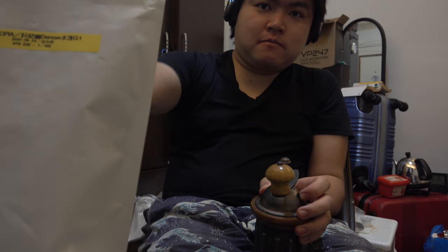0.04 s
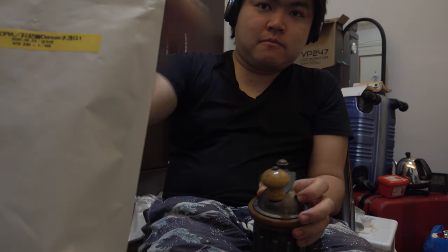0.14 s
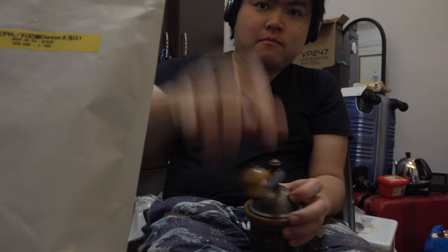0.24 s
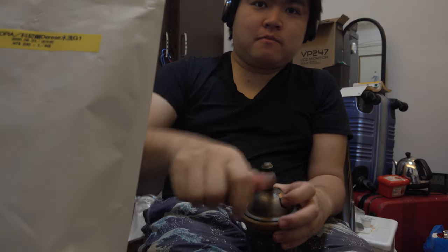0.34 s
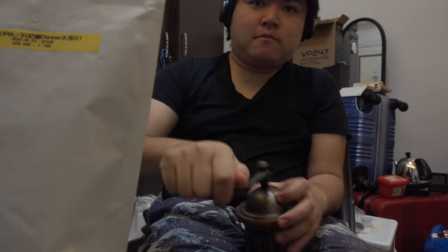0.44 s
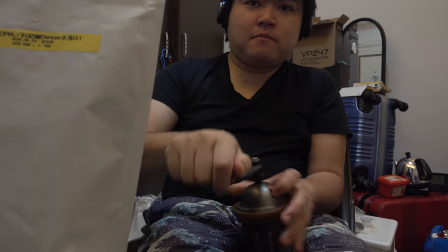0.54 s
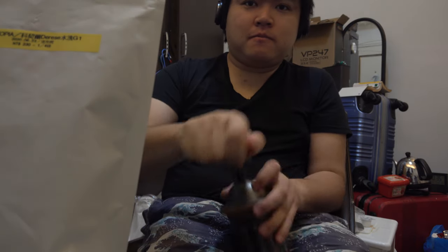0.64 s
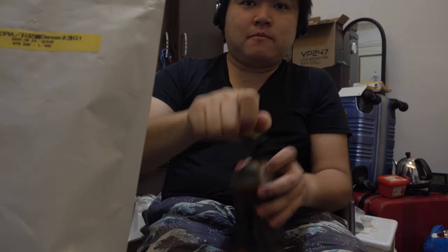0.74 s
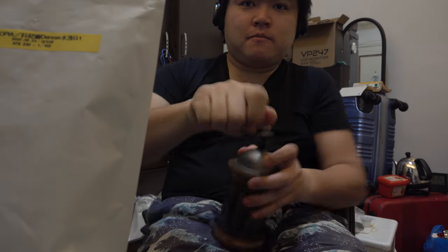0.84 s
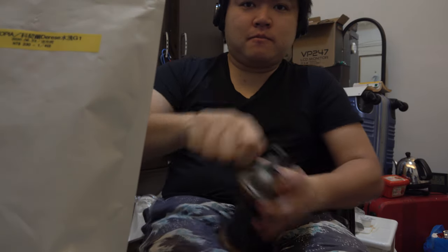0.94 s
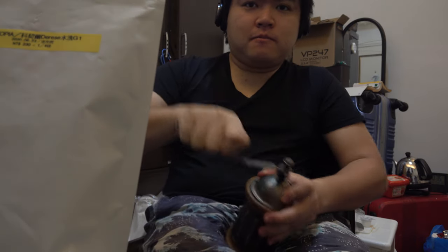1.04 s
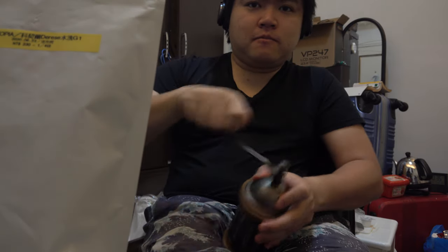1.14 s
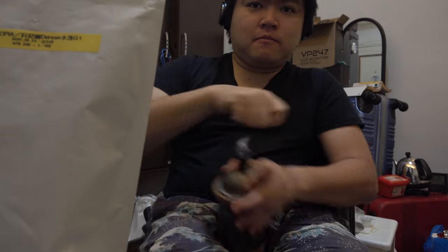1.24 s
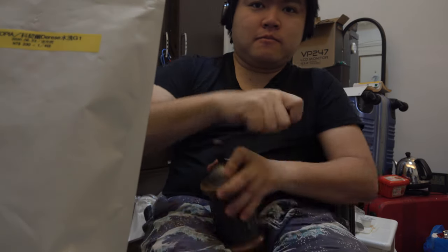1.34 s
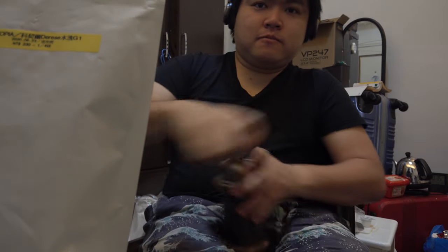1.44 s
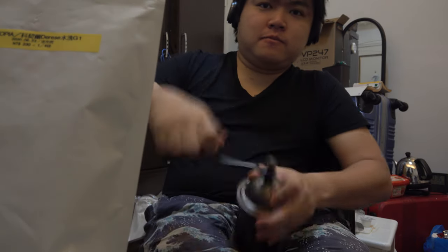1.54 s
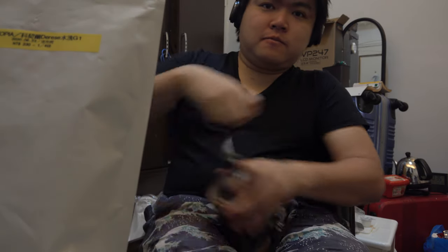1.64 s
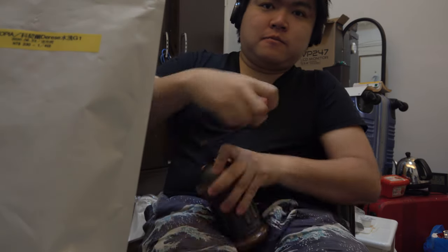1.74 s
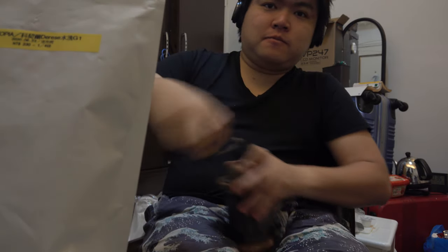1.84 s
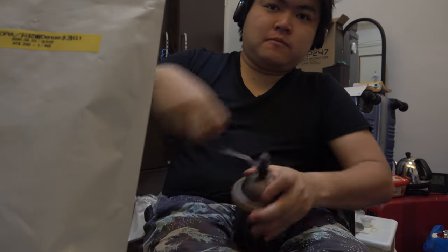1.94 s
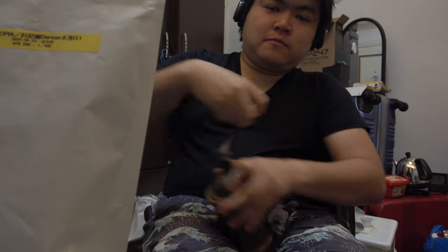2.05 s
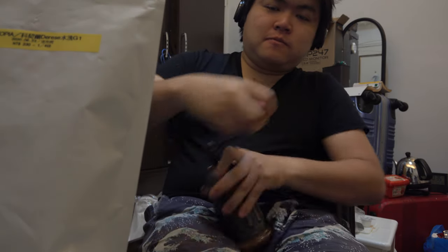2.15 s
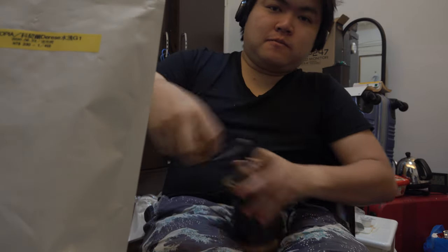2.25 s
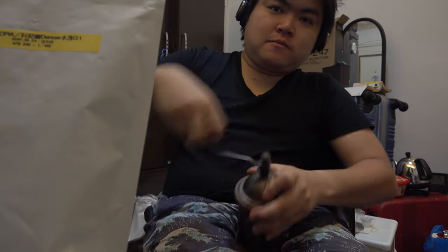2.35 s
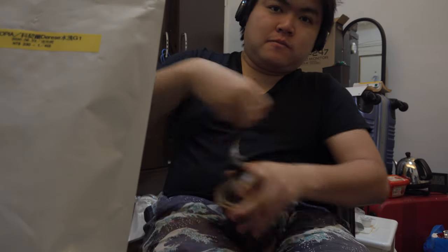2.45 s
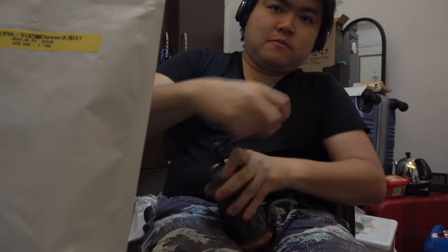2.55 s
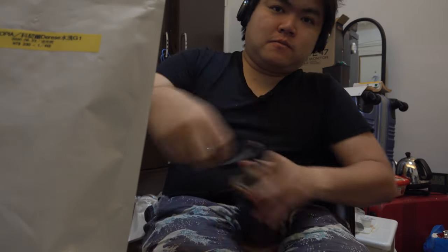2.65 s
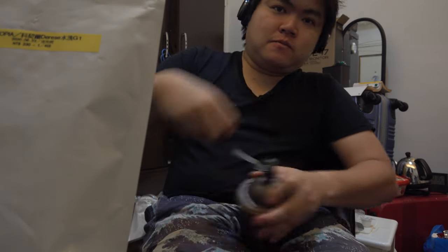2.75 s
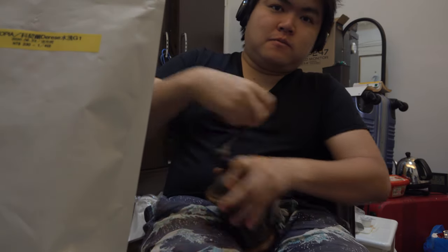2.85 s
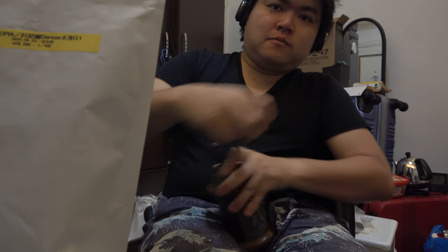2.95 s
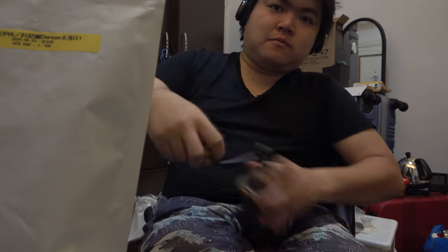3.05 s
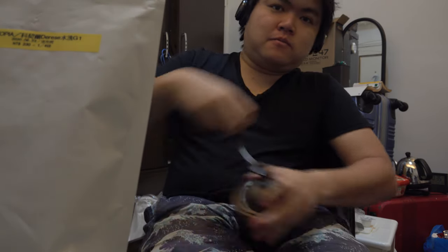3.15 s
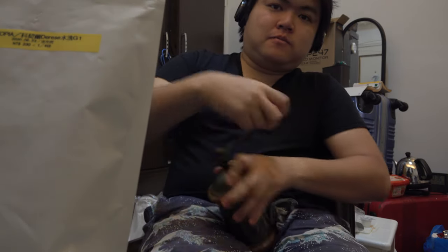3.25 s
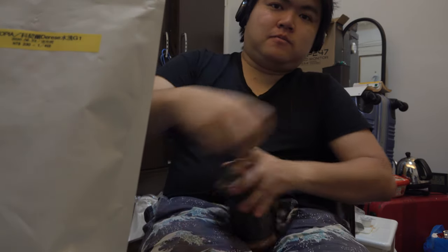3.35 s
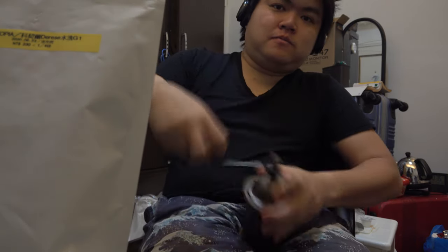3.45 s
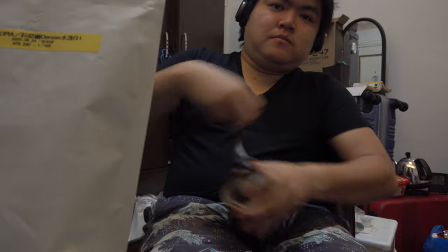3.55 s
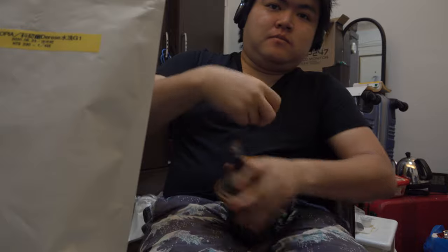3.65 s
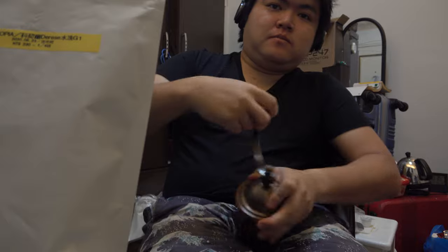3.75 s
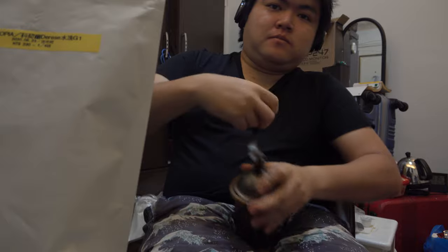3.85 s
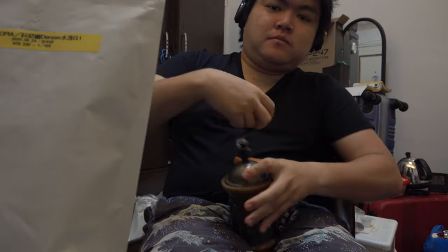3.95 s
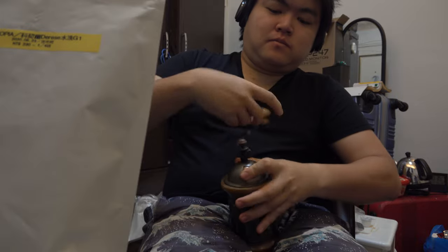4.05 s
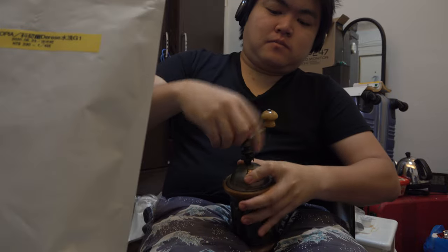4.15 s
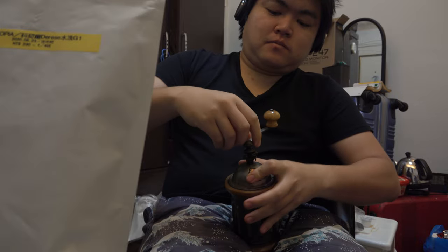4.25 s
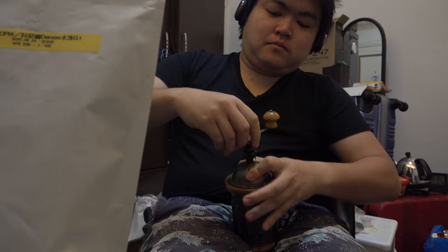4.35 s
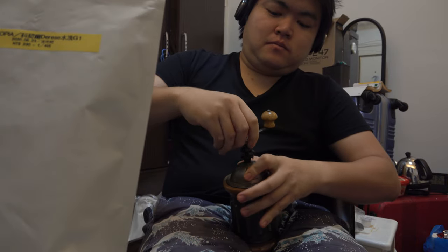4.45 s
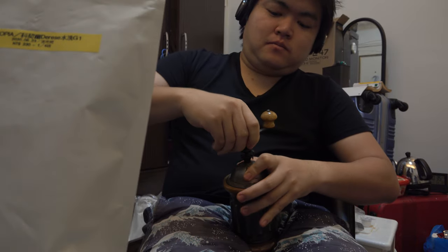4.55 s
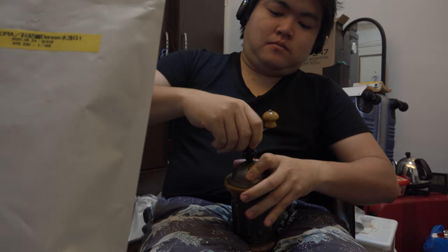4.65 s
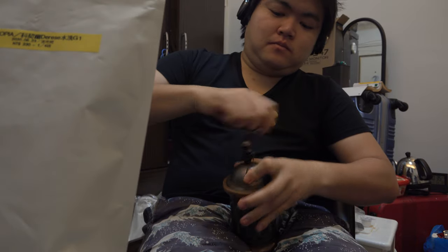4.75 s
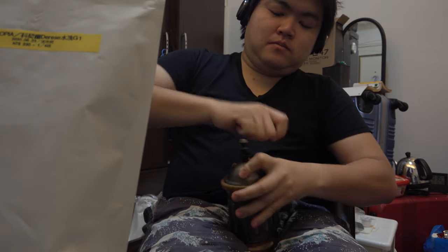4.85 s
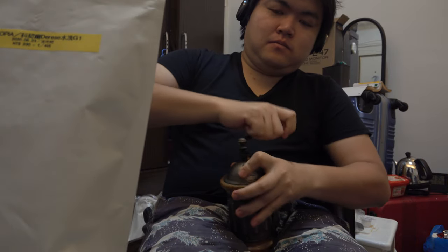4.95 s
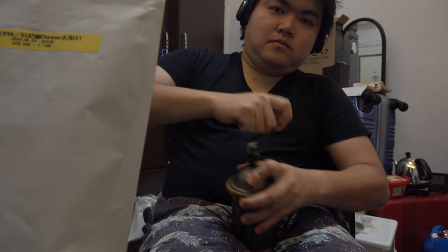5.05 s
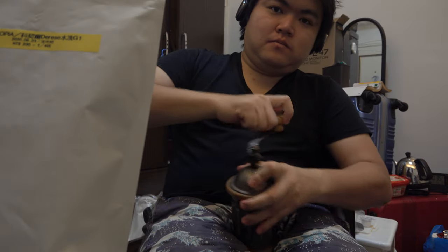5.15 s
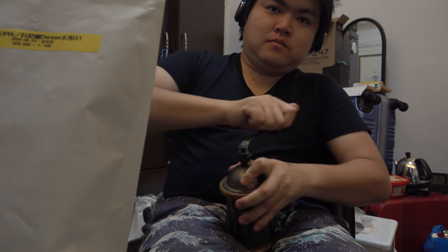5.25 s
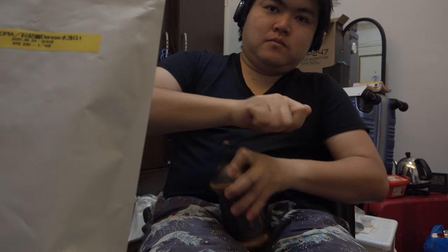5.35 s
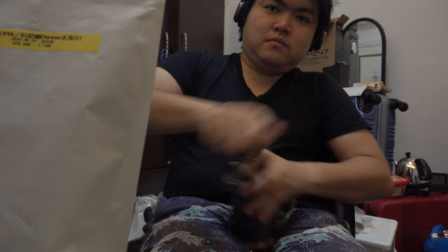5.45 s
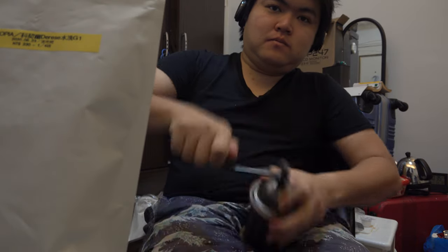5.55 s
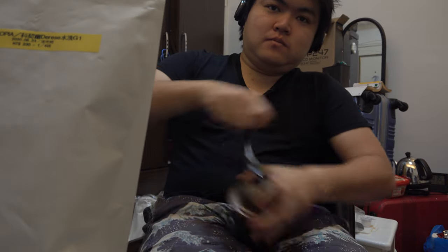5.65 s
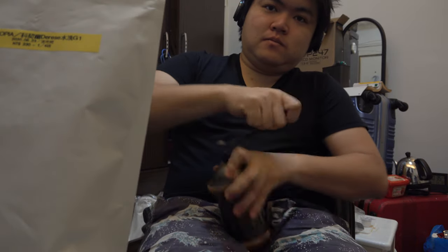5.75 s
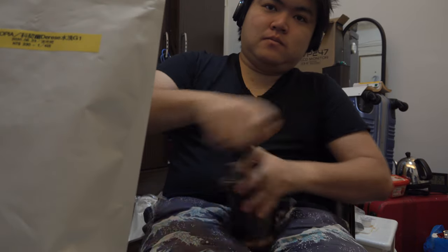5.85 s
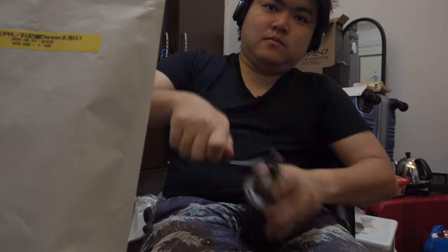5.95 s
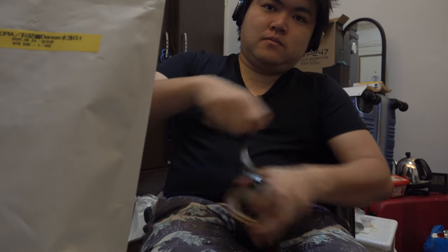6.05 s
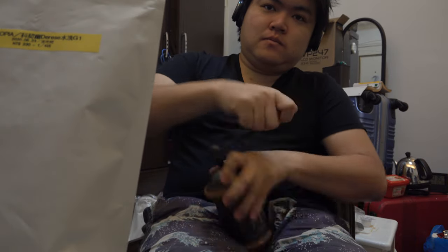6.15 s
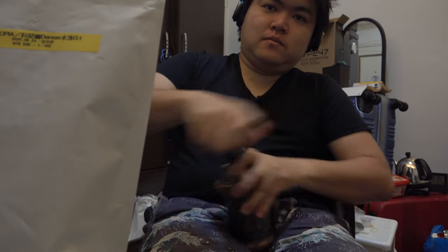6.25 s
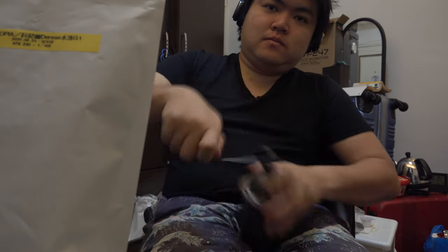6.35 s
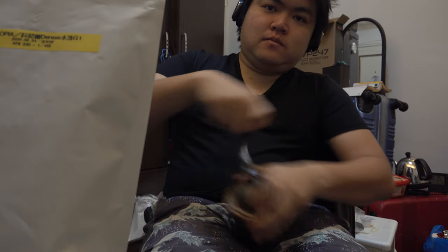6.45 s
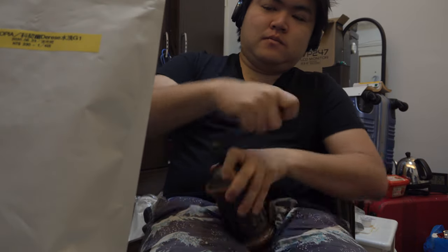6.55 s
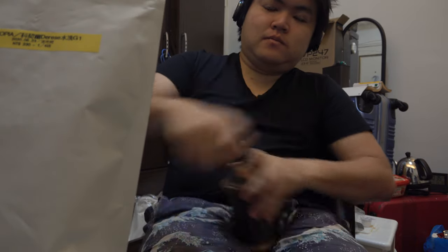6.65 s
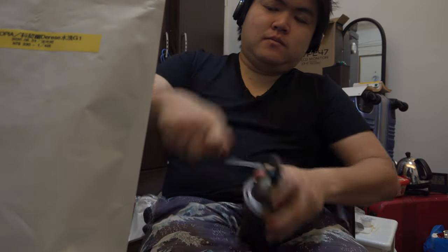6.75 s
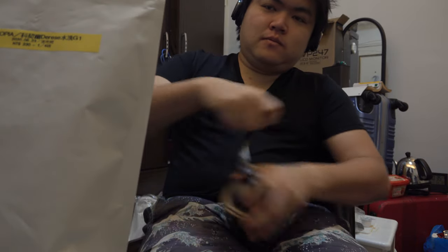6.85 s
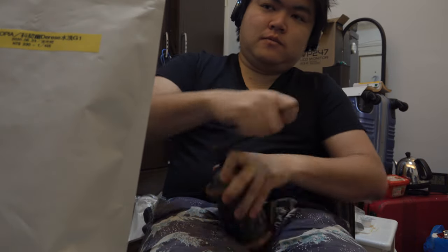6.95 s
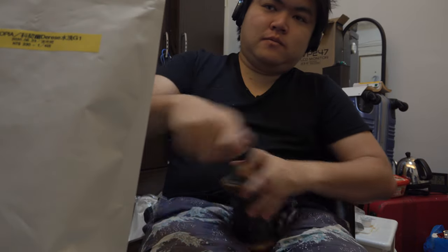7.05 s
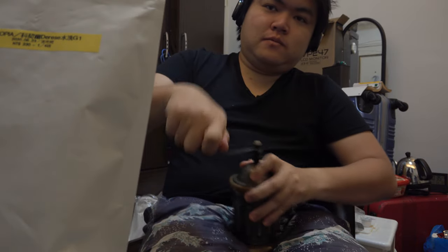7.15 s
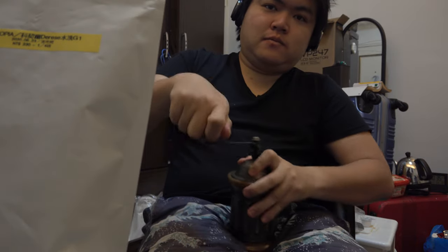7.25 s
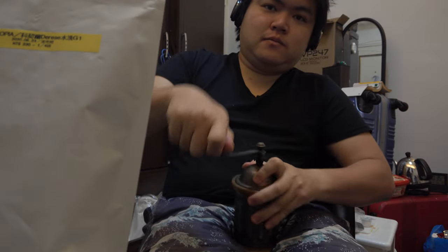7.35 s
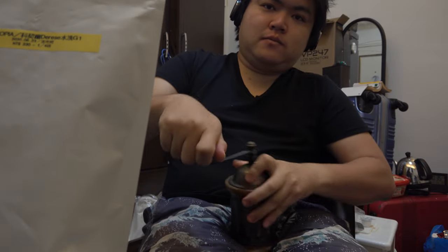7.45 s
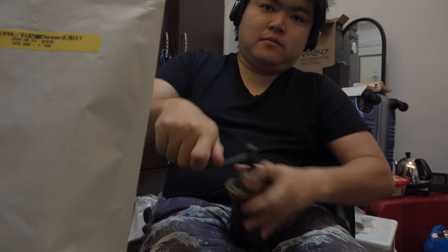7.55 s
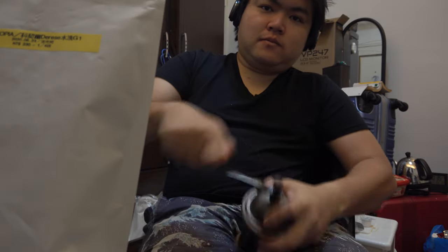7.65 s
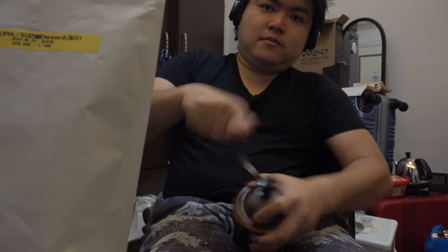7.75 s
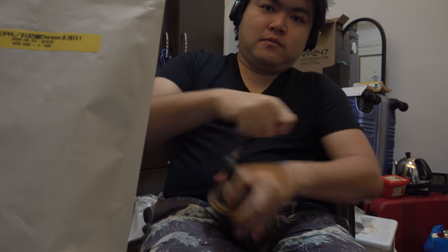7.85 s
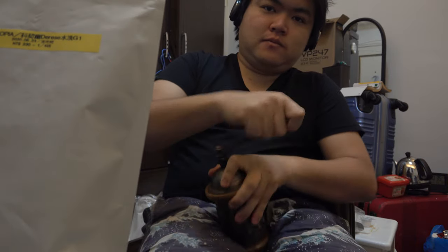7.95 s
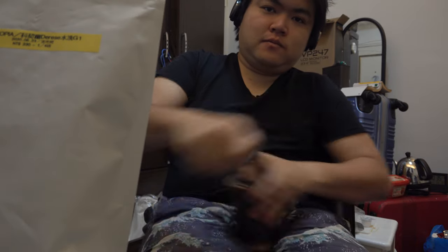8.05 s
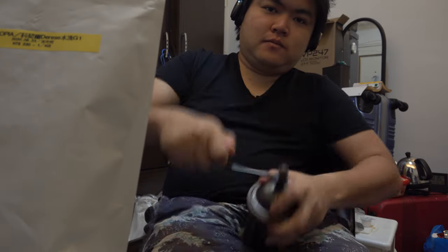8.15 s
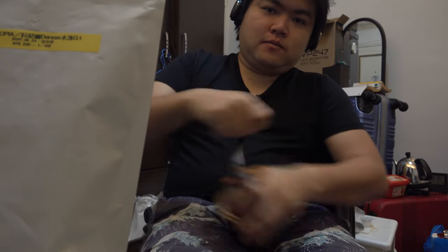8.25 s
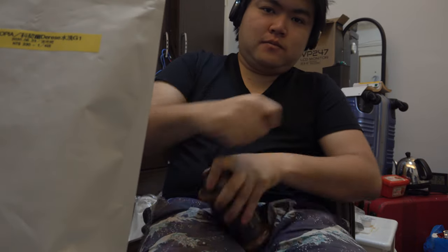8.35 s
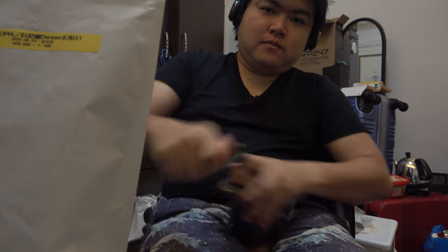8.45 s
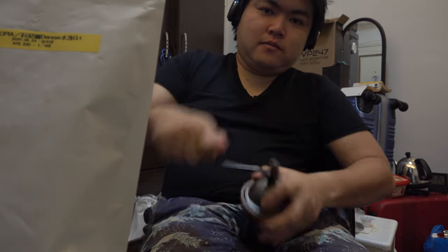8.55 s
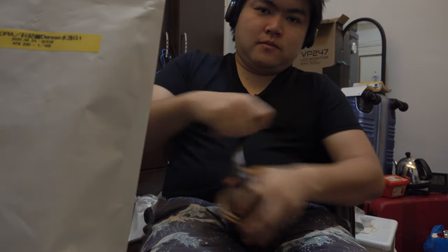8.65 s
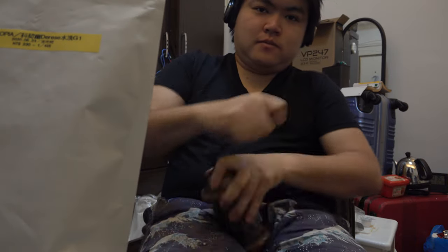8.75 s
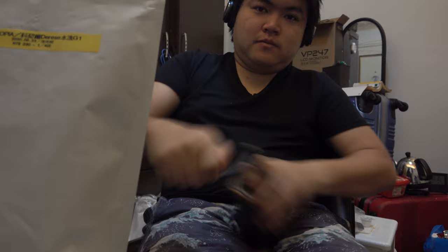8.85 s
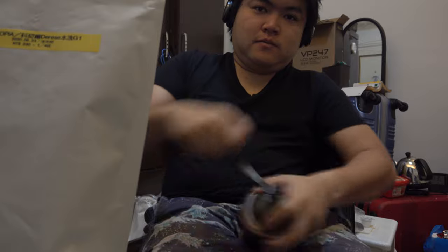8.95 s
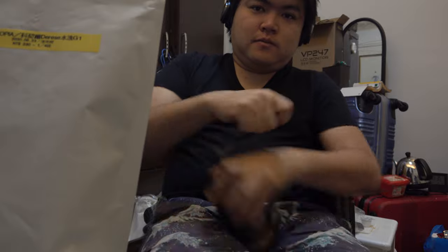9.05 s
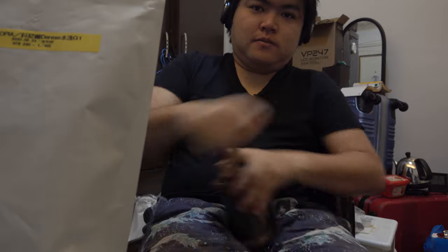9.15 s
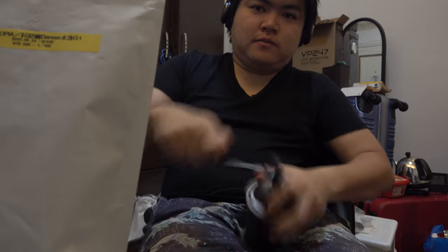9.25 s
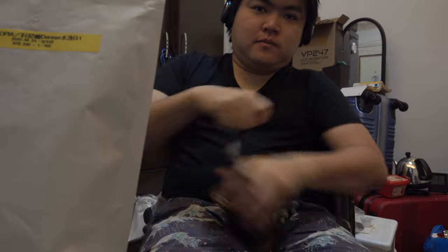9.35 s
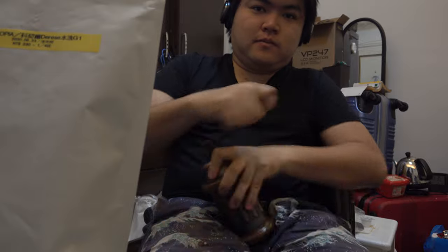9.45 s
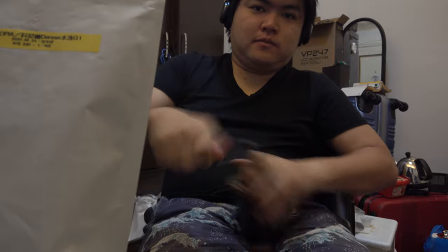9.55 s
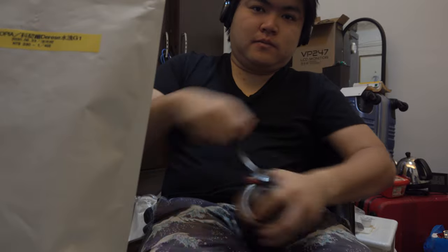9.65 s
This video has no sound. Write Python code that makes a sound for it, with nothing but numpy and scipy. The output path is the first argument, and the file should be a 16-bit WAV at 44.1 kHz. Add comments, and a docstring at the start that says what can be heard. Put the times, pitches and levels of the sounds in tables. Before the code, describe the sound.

A hand coffee mill crunches through beans in three spells, with knocks and a light crank rattle in the pauses.

```python
"""A hand coffee mill is cranked in the lap in a small furnished room, while a fan hums far off.
First the hands knock on the mill. From about 1 s beans crack and crumble between the burrs; each fracture
is an impulse that excites the wooden box (low), the burrs (middle) and the metal dome (high).
In a pause from 3.6 s the loose crank rattles, crumbs settle and the spindle squeaks by stick-slip friction.
Grinding resumes at 5.3 s, stops at 7.1 s for a few knocks, and runs again from 7.7 s to the end."""
import sys
import numpy as np
from scipy import signal
from scipy.fft import rfft, irfft, next_fast_len
from scipy.io import wavfile
from scipy.ndimage import uniform_filter1d

SR = 44100
rng = np.random.default_rng(int(sys.argv[2]) if len(sys.argv) > 2 else 0)


def store_wav(level_fs):
    """Save 16-bit WAV to argv[1]."""
    pcm = np.round(np.clip(np.atleast_2d(level_fs), -1, 1) * 32767)
    wavfile.write(sys.argv[1], SR, pcm.T.astype(np.int16))


N = 427329

# Levels in the tables are relative: gains and filters follow.
# Spectrum of the fan's air noise: frequency_hz, density_db
FAN_SPECTRUM = [(60, -44), (125, -29.5), (205, -42), (300, -29.5), (560, -15), (1000, -17), (1800, -25),
                (2900, -25.5), (3700, -42), (6000, -45), (14000, -40), (16000, -53.5)]
# Narrow noise bands of the fan's whine: pitch_hz, width_hz, level_db
FAN_WHINE = [(676, 4, -71), (700, 9, -80)]
# Reverberation time: frequency_hz, t60_s
ROOM_DECAY = [(300, 0.28), (1400, 0.29), (4000, 0.27), (10000, 0.23), (15000, 0.24)]
# Likeness of left and right echoes: frequency_hz, correlation
ROOM_COHERENCE = [(200, 0.94), (700, 0.95), (2000, 0.46), (5000, 0.11), (14000, .05)]
# Level difference of the microphone ports: frequency_hz, left_over_right_db
PORT_BALANCE = [(60, 7.5), (120, 6.5), (240, -0.5), (480, -0.5), (950, -3), (1890, -2), (3770, -4),
                (7520, 2), (15000, -3)]
# Phase difference of the ports: frequency_hz, left_lead_rad
PORT_LEAD = [(200, .1), (1120, .65), (3900, .35), (5950, 1.05), (7500, -.2), (13200, -.3)]
# Narrow cuts in the recorder: centre_hz, width_hz
NOTCHES = [(5760, 250), (6720, 230), (7680, 200)]
# Borders between drawer, box, burrs, dome and the thin top edge of the sound: frequency_hz
PART_BORDERS_HZ = [650, 1500, 5500, 9500]
# Spectrum of the mill's impulse response: frequency_hz, density_db
MILL_SPECTRUM = [(71, -85), (120, -36), (222, -50.5), (272, -32), (314, -28.5), (493, -7), (643, -10.5),
                 (822, 1), (1490, -3.5), (2640, -2), (3900, -5.5), (7200, -2.5), (9790, -12.5),
                 (13900, -14), (16000, -13.5)]
# Decay of that response, before each source shortens it: frequency_hz, t60_s
MILL_DECAY = [(250, 0.072), (1000, 0.047), (4000, 0.023), (14000, 0.014)]
# Resonances and dips of box, burrs and dome: centre_hz, width_hz, lift_db
BODY_RESONANCES = [(274.3, 23, 10), (476, 85, 6.5), (572, 11, -7), (811, 101, 7), (1100, 20, 1),
                   (4340, 160, 3), (6710, 2320, 5), (7260, 90, 3), (9800, 210, -12), (13700, 1200, 3)]
# Knocks of hand and crank on the resting mill: start_s, level_db, box_over_burr_db, dome_over_burr_db
KNOCKS = [(0.415, -41, -7, -22), (0.645, -46, 4, -9), (0.6737, -25.5, 2.5, -11), (0.705, -28.5, -3, -12),
          (0.716, -42, -5, 9), (0.7959, -26.5, -5, -1.5), (3.992, -42, -3, -23), (4.043, -31, -11, -1),
          (4.1058, -47, 4, 1), (4.136, -30, -2, 8), (4.1399, -28, -2, 7), (4.8124, -33, -10, -6),
          (4.8164, -21.5, -9, 9), (4.8166, -18, -7.5, 5), (4.8222, -31, 6, -4), (5.089, -31.5, -11, 7.5),
          (5.128, -25, -9, 0), (7.366, -50, -16, 4.5), (7.408, -35, -22, -10), (7.4957, -35, -4, -20),
          (7.606, -45, 7, -6), (7.62, -36.5, 7.5, -1)]
# Runs of touches of the loose crank: start_s, length_s, level_db, tilt_db_per_octave
RATTLES = [(3.716, .015, -29, 4), (3.762, .03, -33, 5.5), (3.7927, .075, -24, 4), (4.773, .005, -39.5, -6),
           (5.098, .005, -29.5, -0.5), (5.122, .012, -38, 2), (5.139, 0.013, -19, 1.5),
           (5.236, .005, -26, -0.5)]
# Modes of the crank: pitch_hz, level_db, t60_s
CRANK_MODES = [(900, -9.5, 0.048), (2520, -8, 0.045), (3500, -8.5, 0.041), (4870, -7.5, 0.017),
               (5400, 3, 0.043), (7100, -2, 0.03), (9900, -4, 0.027), (13500, -8, 0.026)]
# Course of the squeak: time_s, slip_rate_hz, level_db
SQUEAK_GLIDE = [(5.143, 694, -44), (5.149, 703, -8), (5.162, 698, -18), (5.169, 666, -36),
                (5.183, 637, -26), (5.19, 672, -3), (5.194, 758, -6), (5.202, 688, -10), (5.212, 712, -4),
                (5.218, 684, -45)]
# Resonances of the spindle: centre_hz, width_hz, level_db
SPINDLE_RESONANCES = [(750, 400, -6), (1420, 400, -4), (2120, 260, 3.5), (2850, 470, 5), (4430, 450, -6)]
# Spells of crumbling, faint when only handled: start_s, end_s, burr_db, box_over_burr_db, dome_over_burr_db
SPELLS = [(0.369, 0.41, -62, -2, -4.5), (0.687, 0.9, -64, -1.5, -1), (0.941, 0.97, -60.5, -18.5, 5),
          (1.008, 1.062, -33.5, -4.5, -1.5), (1.134, 3.62, -27.5, -2.5, -2), (3.763, 3.847, -48, -18, 3.5),
          (4.035, 4.272, -67.5, 0, -11), (5.283, 5.29, -35.5, 3.5, -4), (5.322, 7.125, -27, -3, -1.5),
          (7.651, 9.7, -27, -3.5, -2.5)]
# Surges of effort, about one a turn: time_s, box_swell_db, burr_swell_db, dome_swell_db, strain_db
SURGES = [(1.201, -0.5, 0, -1.5, 13), (1.5, 0, 4.5, 5.5, -4), (1.88, 1.5, 1.5, 3, 14),
          (2.3, -2.5, 0.5, 2, 11), (2.655, 2, 0.5, 3, 8.5), (3.012, -1.5, 1, 5.5, 24.5),
          (3.14, 3.5, 3.5, 4, -9.5), (3.412, 1.5, 3, 5, 16.5), (5.49, 0.5, -0.5, -0.5, 16),
          (5.85, -1.5, -0.5, -0.5, 11), (6.1, 0, 0.5, -1.5, -10), (6.32, 1.5, 0.5, 1, 2),
          (6.5, 1.5, 0, -2, 9), (6.68, 3, 3, 2.5, 7), (7.039, 3, 1, 3.5, -2), (7.7, 1, 0.5, -1, -1),
          (8.086, 0, -3, -1, 22), (8.435, 3, -0.5, 1, 12), (8.83, 5, 0.5, -0.5, 7),
          (9.23, 3.5, 1, 3.5, 5.5), (9.61, 5.5, 6, 7, -2)]
# The crank stalls until the beans give: deepest_s, depth_db, sag_s
STALLS = [(1.34, 9, 0.088), (1.668, 5.5, 0.11), (2.07, 3, 0.031), (2.2, 5, 0.052), (2.51, 3, 0.074),
          (3.23, 10.5, 0.028), (5.42, 3, 0.12), (6.57, 3.5, 0.036), (6.75, 5, 0.04), (6.971, 4.5, 0.092),
          (7.781, 23, 0.068), (7.95, 3.5, 0.038), (8.91, 7.5, 0.039), (9.394, 12.5, 0.049),
          (9.58, 3, 0.068)]
# Rasps of the burrs; strain favours the higher one: pitch_hz, width_hz, level_db, strain_exponent
RASPS = [(2725, 410, -15.5, 0.57), (2300, 640, -18.5, -1.5)]
# Chips of bean flying against the dome: start_s, level_db, pitch_hz
CHIPS = [(1.6406, -7, 13500), (2.47, -5, 9330), (3.522, -3, 13500), (3.5607, -8, 13300), (5.86, -7, 13100),
         (6.0691, -3, 13500), (6.146, -13, 13800), (6.463, 0, 13200), (6.6125, -5, 9400),
         (7.192, -10, 11200), (8.7224, -5, 13800), (8.872, -7, 11000), (9.2883, -19, 14700),
         (9.327, -1, 9700)]
# Two rings of the dome around which small chips sound: pitch_hz
DOME_GLINTS_HZ = [10100, 13700]
# The loudest beans cracking: start_s, level_db, pitch_hz, dome_over_burr_db
CRACKS = [(0.976, -19, 5100, -3), (1.0147, -8, 6340, -7), (1.032, -14, 2160, -3.5), (1.095, -16, 2310, -1),
          (1.126, -8, 6200, -1.5), (1.1666, -6.5, 3230, -1), (1.176, -9.5, 2780, 4),
          (1.234, -11, 6510, -0.5), (1.262, -8, 7100, 2), (1.2984, -8.5, 7640, 1), (1.3568, -8, 2580, 0),
          (1.737, -7, 2930, -8), (1.955, -10, 5250, 2.5), (2.155, -8.5, 1630, -3), (2.2957, -10.5, 2730, 4),
          (2.3309, -7, 2540, 2), (2.393, -15, 7300, -1), (2.4277, -7, 7090, 1.5), (2.443, -8, 6400, 0),
          (2.737, -6, 7260, -2), (2.7556, -10, 7210, 0), (2.7788, -10, 7400, -2), (2.825, -12, 3300, 5),
          (3.103, -16, 6170, 0), (3.116, -12, 7380, -2), (3.2752, -13, 2850, 3), (3.4523, -14, 2160, 5),
          (3.6373, -7.5, 6920, -3.5), (3.644, -12.5, 7450, 3), (5.269, -15, 4230, -3),
          (5.284, -14.5, 2520, -2), (5.304, -15, 7000, -5), (5.3208, -9, 7200, -0.5),
          (5.3275, -10.5, 2800, 0.5), (5.3523, -6, 7100, -8), (5.362, -16, 7080, 1),
          (5.522, -12, 7390, 0.5), (5.638, -11, 1890, 5.5), (5.897, -16, 4600, -3), (5.9, -10, 2610, -3),
          (6.0067, -6, 7340, -2), (6.147, -10.5, 3000, 4), (6.2445, -9.5, 2370, 1.5),
          (6.5133, -9, 6430, -2), (6.7156, -7, 7280, -5), (6.529, -11.5, 2610, 6), (6.795, -23, 7330, -2),
          (7.142, -14, 7300, -1.5), (7.639, -18, 2160, -3), (7.685, -13.5, 7200, 1), (7.698, -19, 2400, -4),
          (7.718, -11, 2410, 0.5), (7.791, -7.5, 3520, -1), (7.9976, -8.5, 6300, -0.5),
          (8.011, -21, 5000, -7), (8.042, -17, 2070, -6), (8.095, -7.5, 6380, -4), (8.193, -10, 6410, -2),
          (8.246, -8, 3330, 1), (8.2732, -8, 3440, -2), (8.545, -10, 6400, -5), (8.65, -3, 3300, 0),
          (8.7837, -8.5, 2520, 0.5), (8.799, -7, 2400, 1), (8.829, -6.5, 6330, 0.5), (8.872, -18, 6400, -3),
          (8.985, -14.5, 2300, 5.5), (9.136, -17, 6100, 2), (9.227, -18, 6500, -1),
          (9.3323, -11.5, 6910, 4), (9.4847, -14.5, 3130, -5)]

BAND_EDGES_HZ = 120 * 2 ** np.arange(0, 7.3, .4)
BAND_CENTRES_HZ = np.sqrt(BAND_EDGES_HZ[1:] * BAND_EDGES_HZ[:-1])
CRUMBLE_DB, CRACK_DB, KNOCK_DB, ROOM_DB, FAN_DB = -2.5, -8, -4.5, -6, -62.5
TURNS_PER_S, FRACTURES_PER_S, SMALL_CHIPS_PER_S = 2.6, 560, 39
CLUMP_DB, SIZE_SPREAD_DB, COLOUR_SPREAD_DB = 1.5, 3, 4
FRACTURE_RISE_S, CHIP_T60_S, ECHO_BUILD_S = 0.00054, 0.008, 0.007
TOUCH_GAP_S, TOUCH_LOSS_DB = 0.0097, 2
START_DB_PER_S, STOP_DB_PER_S, BOX_STOP_DB_PER_S = 2004, 213.5, 506.5
SWELL_S, BURR_LAG_S, DOME_LAG_S = 0.059, 0.091, 0.11
STRAIN_S, RASP_LEAD_S, RECOVER_S, HUSH_S, HUSH_DB = 0.038, 0.019, 0.033, 0.018, 1
EDGE_FOLLOWS = 0.56   # extra dB in the top edge for each dB of dome over burr


def from_db(db):
    """Amplitude ratio of a level in decibels."""
    return 10 ** (np.asarray(db) / 20)


def unit_rms(x):
    """Normalisation to unit mean power."""
    return x / np.sqrt(np.mean(x ** 2) + 1e-20)


def at_hz(points, hz):
    """Interpolation along logarithmic frequency."""
    return np.interp(np.log(hz), np.log(np.array(points)[:, 0]), np.array(points)[:, 1])


def band(x, k):
    """Band-pass filtering by band k of the filter bank."""
    return signal.sosfilt(signal.butter(2, BAND_EDGES_HZ[k:k + 2], "band", fs=SR, output="sos"), x)


def resonance(x, hz, width_hz):
    """Forced response of a damped oscillator, with unit gain at its peak."""
    r = np.exp(-np.pi * width_hz / SR)
    poles = [1, -2 * r * np.cos(2 * np.pi * hz / SR), r * r]
    return signal.lfilter(np.array([1, 0, -1]) * (1 - r * r) / 2, poles, x)


def fan():
    """Stationary air noise, weakly correlated between the sides, with a faint narrow-band whine."""
    shared, own, coherence = rng.standard_normal(N), rng.standard_normal((2, N)), 0.14
    white = np.sqrt(coherence) * shared + np.sqrt(1 - coherence) * own
    bins_hz = np.maximum(np.fft.rfftfreq(N, 1 / SR), 1)
    air = unit_rms(irfft(rfft(white) * from_db(at_hz(FAN_SPECTRUM, bins_hz)), N))
    whine = sum(from_db(db) * unit_rms(resonance(shared, hz, width)) for hz, width, db in FAN_WHINE)
    return from_db(FAN_DB) * air + whine


def room(x):
    """Diffuse reverberation decays exponentially; the mill's sway blends three echo patterns."""
    t, echoes = np.arange(SR // 2) / SR, 0
    sway = 2 * np.pi * TURNS_PER_S / 2 * np.arange(N) / SR
    for place in range(3):
        white = rng.standard_normal((2, 3, len(t))) * np.clip(t / ECHO_BUILD_S, 0, 1) ** 2
        tail = 0
        for k, hz in enumerate(BAND_CENTRES_HZ):
            noise, coherence = band(white[k % 2], k), at_hz(ROOM_COHERENCE, hz)
            sides = np.sqrt(coherence) * noise[0] + np.sqrt(1 - coherence) * noise[1:]
            tail = tail + sides * from_db(-60 * t / at_hz(ROOM_DECAY, hz))
        tail = tail / np.sqrt(1.5 * (tail ** 2).sum(axis=1, keepdims=True))
        share = x * np.cos(sway + place * 2 * np.pi / 3)
        echoes = echoes + signal.fftconvolve(share[None], tail, axes=1)[:, :N]
    return echoes


def ports(x):
    """Level and phase differences between two close microphone ports give the stereo image."""
    size = next_fast_len(N + 4096)
    hz = np.maximum(np.fft.rfftfreq(size, 1 / SR), 1)
    left = from_db(at_hz(PORT_BALANCE, hz) / 2) * np.exp(.5j * at_hz(PORT_LEAD, hz))
    return irfft(rfft(x, size) * [left, 1 / left], size)[:, :N]


def colours(count):
    """Random spectra of unit variance, one an impulse, correlated between neighbouring bands."""
    return uniform_filter1d(rng.standard_normal((count, len(BAND_CENTRES_HZ))), size=2, axis=1) * np.sqrt(2)


def impulse_responses(onsets, colour_db, part_sizes, spike_db, decay_scale):
    """Impulse excitation: a spike and a noise burst decaying by band; one signal for each part."""
    first, last = onsets.min(), min(onsets.max() + SR // 4, N)
    parts, white = np.zeros((len(part_sizes), N)), rng.standard_normal((2, N))[:, first:last]
    rise = np.exp(-1 / (FRACTURE_RISE_S * SR))
    sign = rng.choice([-1, 1], N)[onsets]
    for k, hz in enumerate(BAND_CENTRES_HZ):
        part = np.searchsorted(PART_BORDERS_HZ, hz)
        size = part_sizes[part] * from_db(colour_db[:, k])
        impulses = np.full(last - first, 1e-12)
        impulses[onsets - first] = size ** 2   # overlapping bursts add in power
        decay = from_db(-120 / (decay_scale * at_hz(MILL_DECAY, hz) * SR))
        power = signal.lfilter([1], [1, -decay], impulses)
        power = signal.lfilter([1 - rise], [1, -rise], power)   # a break spreads through the bean
        burst = white[k % 2] * np.sqrt(power)
        burst[onsets - first] += from_db(spike_db) * sign * size
        parts[part, first:last] += from_db(at_hz(MILL_SPECTRUM, hz)) * band(burst, k)
    return parts


def blows(start_s, burr_db, box_db, dome_db, edge_db=0, colour_db=0, decay_scale=0.5):
    """Single impacts, drier than the crumbling, divide their energy among box, burrs and dome."""
    band_power = from_db(2 * at_hz(MILL_SPECTRUM, BAND_CENTRES_HZ)) * np.diff(BAND_EDGES_HZ) * 2 / SR
    part = np.searchsorted(PART_BORDERS_HZ[1:3], BAND_CENTRES_HZ)
    box, burr, dome = (from_db(burr_db + db) / np.sqrt(band_power[part == k].sum())
                       for k, db in enumerate([box_db, 0, dome_db]))
    edge = dome * from_db(EDGE_FOLLOWS * dome_db + edge_db)
    colour_db = colour_db + 0.99 * colours(len(start_s))
    return impulse_responses((start_s * SR).astype(int), colour_db, [box, box, burr, dome, edge],
                             spike_db=5, decay_scale=decay_scale).sum(axis=0)


def mill_body(x):
    """Resonance: box, burrs and dome lift their own pitches, with two dips between."""
    for hz, width_hz, lift_db in BODY_RESONANCES:
        x = x + (from_db(lift_db) - 1) * resonance(x, hz, width_hz)
    return x


def knocks():
    """Damping by the hands keeps knocks short; soft contact takes away the highest treble."""
    impacts = blows(*np.transpose(KNOCKS), edge_db=-1.5, decay_scale=0.51)
    return signal.sosfilt(signal.butter(2, 11000, fs=SR, output="sos"), impacts)


def rattle():
    """Modal vibration: each touch on the spindle strikes the crank's modes unequally, over a dry snap."""
    start_s, length_s, first_db, run_tilt_db = np.transpose(RATTLES)[:, :, None]
    touch, chance = np.arange(8), rng.standard_normal((len(RATTLES), 2, 8))
    delay_s = np.cumsum(TOUCH_GAP_S * np.exp(0.45 * chance[:, 0]) * (touch > 0), axis=1)
    touch_db = first_db - TOUCH_LOSS_DB * touch - 4.5 * chance[:, 1] * (touch > 0)
    touch_db = np.where(delay_s <= length_s, touch_db, -200).ravel()
    touch_s, tilt_db = (start_s + delay_s).ravel(), np.repeat(run_tilt_db, len(touch))
    onsets, ring = (touch_s * SR).astype(int), np.zeros(N)
    scatter_db = 2.7 * rng.standard_normal((len(onsets), len(CRANK_MODES)))
    for k, (hz, mode_db, t60_s) in enumerate(CRANK_MODES):
        impulses = np.full(N, 1e-18)
        impulses[onsets] = from_db(touch_db - 15 + mode_db + tilt_db * np.log2(hz / 8000) + scatter_db[:, k])
        r, w = from_db(-60 / (t60_s * SR)), 2 * np.pi * hz / SR
        ring += signal.lfilter([0, np.sin(w)], [1, -2 * r * np.cos(w), r * r], impulses)
    return ring + blows(touch_s, touch_db - 6, box_db=-19, dome_db=3 * tilt_db, edge_db=-3, colour_db=-0.5)


def squeak():
    """Stick-slip friction: nearly periodic pulses at a gliding rate ring the spindle."""
    time_s, rate_hz, level_db = np.transpose(SQUEAK_GLIDE)
    t = np.arange(N) / SR
    jitter = 1 + .06 * unit_rms(uniform_filter1d(rng.standard_normal(N), size=60))
    cycles = np.cumsum(np.interp(t, time_s, rate_hz) * jitter) / SR
    slips = np.diff(np.floor(cycles), prepend=0) * from_db(np.interp(t, time_s, level_db, -200, -200)) + 1e-18
    return sum((-1) ** k * from_db(db) * resonance(slips, hz, width)
               for k, (hz, width, db) in enumerate(SPINDLE_RESONANCES))


def effort():
    """Amplitude modulation by spells, surges and stalls: gains of box, burrs and dome, then the strain."""
    t, sample_s = np.arange(0, N, 40) / SR, np.arange(N) / SR
    deepest_s, depth_db, sag_s = np.transpose(STALLS)[:, :, None]
    sag = np.clip(np.minimum(1 + (t - deepest_s) / sag_s, 1 - (t - deepest_s) / RECOVER_S), 0, 1)
    until_crack_s = np.array(CRACKS)[:, :1] - t
    resisting = ((until_crack_s > 0) & (until_crack_s < HUSH_S)).any(axis=0)   # a bean about to crack
    stall_db = (depth_db * sag).sum(axis=0) + HUSH_DB * resisting
    start_s, end_s, burr_db, box_db, dome_db = np.transpose(SPELLS)[:, :, None]
    surge_s, box_swell, burr_swell, dome_swell, strain_db = np.transpose(SURGES)[:, :, None]
    gains = []
    for over_db, stop_rate, swell_db, lag_s in [(box_db, BOX_STOP_DB_PER_S, box_swell, 0),
                                                (0, STOP_DB_PER_S, burr_swell, BURR_LAG_S),
                                                (dome_db, STOP_DB_PER_S, dome_swell, DOME_LAG_S)]:
        fade_db = START_DB_PER_S * np.maximum(start_s - t, 0) + stop_rate * np.maximum(t - end_s, 0)
        surge_db = (swell_db * np.exp(-.5 * ((t - surge_s - lag_s) / SWELL_S) ** 2)).sum(axis=0)
        gain = from_db(burr_db + over_db - fade_db).sum(axis=0) * from_db(surge_db - stall_db)
        gains.append(np.interp(sample_s, t, gain) + 1e-12)
    strain = from_db((strain_db * np.exp(-.5 * ((t - surge_s) / STRAIN_S) ** 2)).sum(axis=0))
    return *gains, np.interp(sample_s, t, strain)


def chips(burr_gain):
    """Damped free vibration: each chip rings the dome roughly; small ones come by chance while grinding."""
    small = np.flatnonzero(rng.random(N) < SMALL_CHIPS_PER_S / SR)
    loudness, choice, detune = rng.standard_normal((len(small), 3)).T
    start_s, level_db, hz = np.transpose(CHIPS)
    small_size = from_db(-27 + 3.5 * loudness) * burr_gain[small] / np.median(burr_gain)
    size = np.r_[from_db(level_db - 10), small_size]
    hz = np.r_[hz, np.where(choice > 0, *DOME_GLINTS_HZ) * np.exp(.04 * detune)]
    onsets, age = np.r_[(start_s * SR).astype(int), small][:, None], np.arange(1024)
    rough = 1 + 2.4 * uniform_filter1d(rng.standard_normal((len(onsets), len(age))), size=9, axis=1)
    envelope = size[:, None] * rough * from_db(-60 * age / SR / CHIP_T60_S)
    rings = envelope * np.sin(2 * np.pi * hz[:, None] * age / SR)
    return np.bincount((onsets + age).ravel(), rings.ravel(), N + len(age))[:N]


def cracks():
    """Brittle fracture: each loud crack is a broadband impulse, lifted around its own pitch."""
    start_s, level_db, hz, dome_db = np.transpose(CRACKS)
    octaves = np.log2(BAND_CENTRES_HZ / hz[:, None])
    lift_db = 4 * np.exp(-.5 * (octaves / 0.36) ** 2)
    return blows(start_s, level_db, box_db=-9, dome_db=dome_db, colour_db=lift_db)


def crumble():
    """Shot noise: dense random fractures, mostly small, come in clumps as each bean breaks up."""
    clumps = unit_rms(uniform_filter1d(uniform_filter1d(rng.standard_normal(N), size=900), size=900))
    onsets = np.flatnonzero(rng.random(N) < FRACTURES_PER_S * from_db(CLUMP_DB * clumps) / SR)
    sizes = from_db(SIZE_SPREAD_DB * np.minimum(rng.exponential(1, len(onsets)), 2.5))
    part_sizes = [sizes ** 0.31] * 2 + [sizes] * 3   # drawer and box even out the sizes
    drawer, box, burr, dome, edge = impulse_responses(
        onsets, COLOUR_SPREAD_DB * colours(len(onsets)), part_sizes, spike_db=-2, decay_scale=0.9)
    box_gain, burr_gain, dome_gain, strain = effort()
    low = from_db(-8.5) * unit_rms(drawer) * np.sqrt(box_gain * burr_gain)   # shaken by box and burrs
    groan = from_db(-14.5) * unit_rms(resonance(box, hz=1127, width_hz=200)) * strain   # box under load
    early_strain = np.roll(strain, -int(RASP_LEAD_S * SR))
    rasp = sum(from_db(db) * unit_rms(resonance(burr, hz, width)) * early_strain ** exponent
               for hz, width, db, exponent in RASPS)
    top = dome + edge * np.clip(dome_gain / burr_gain, .1, 3) ** EDGE_FOLLOWS
    return (low + (unit_rms(box) + groan) * box_gain + (unit_rms(burr) + rasp) * burr_gain
            + unit_rms(top) * dome_gain + chips(burr_gain))


def scene():
    """Superposition of the mill's direct sound, its reverberation and the fan."""
    beans = from_db(CRUMBLE_DB) * crumble() + from_db(CRACK_DB) * cracks()
    mill = mill_body(beans) + from_db(KNOCK_DB) * knocks() + rattle() + squeak()
    mill = signal.sosfilt(signal.butter(3, 235, "high", fs=SR, output="sos"), mill)   # too small for bass
    return ports(mill + from_db(ROOM_DB) * room(mill)) + fan()


def record(dry):
    """Soft saturation rounds the peaks; filters cut the bass, three narrow treble bands and the top."""
    sound = 1.5 * np.tanh(dry / 1.5)
    sound = signal.sosfilt(signal.butter(1, 60, "high", fs=SR, output="sos"), sound)
    for hz, width_hz in NOTCHES:
        sound = sound - .9 * resonance(sound, hz, width_hz)
    return signal.sosfilt(signal.cheby2(14, 45, 16100, fs=SR, output="sos"), sound)


dry = scene()
out = record(dry)
store_wav(out)
```